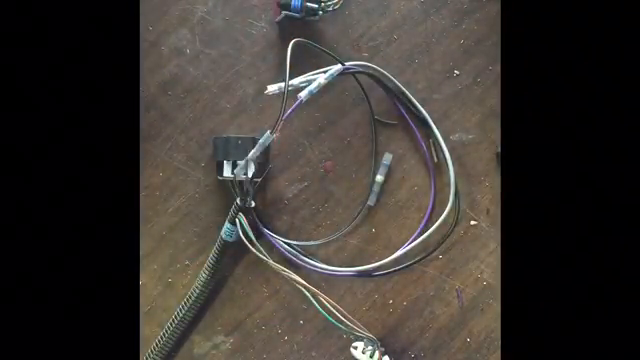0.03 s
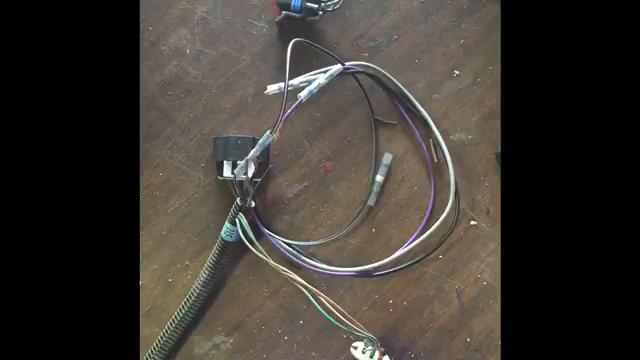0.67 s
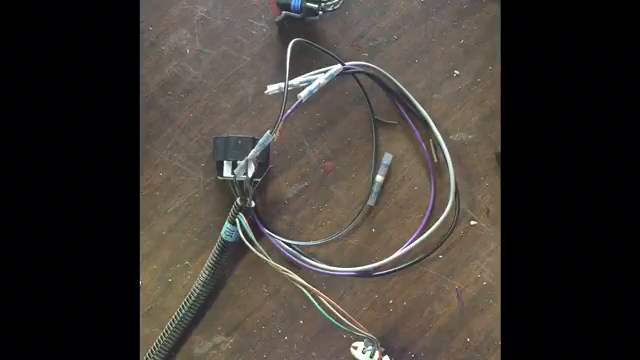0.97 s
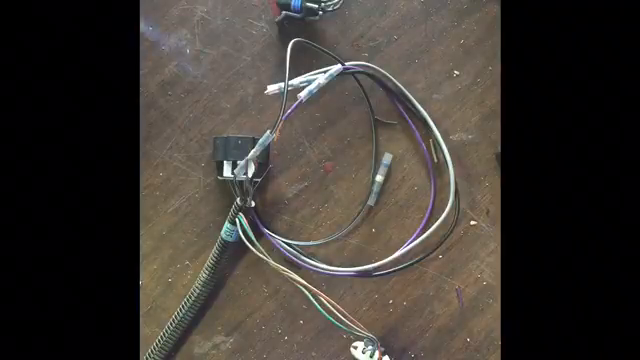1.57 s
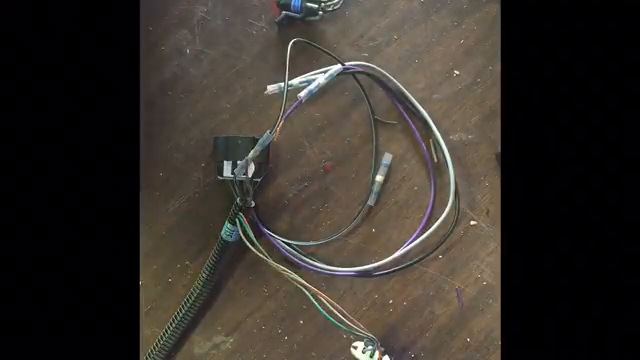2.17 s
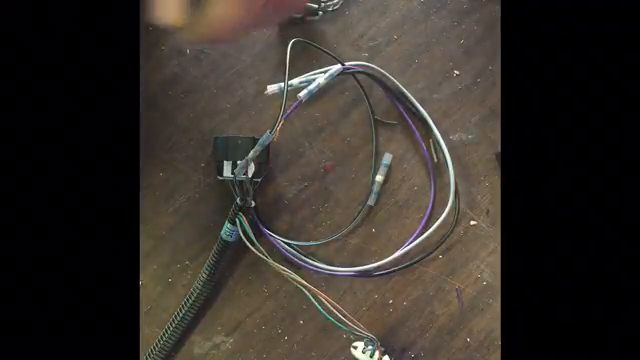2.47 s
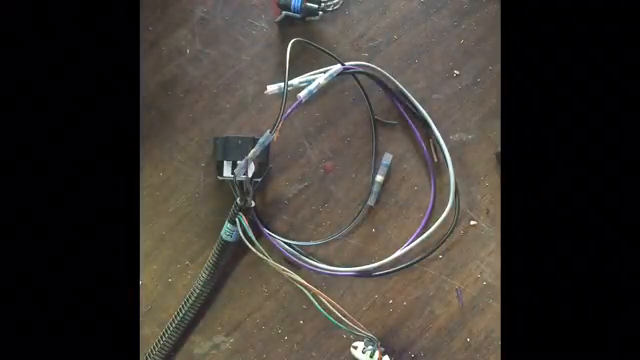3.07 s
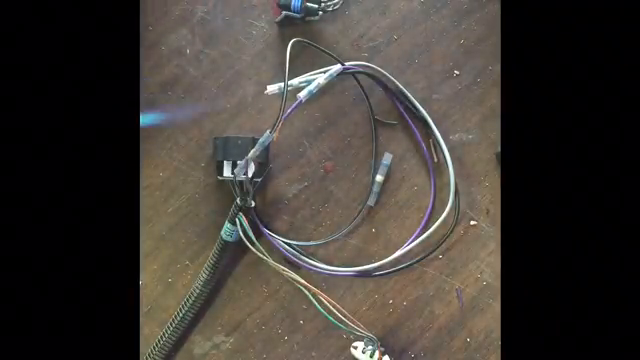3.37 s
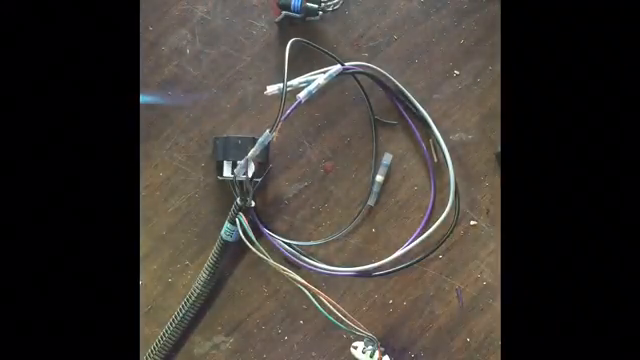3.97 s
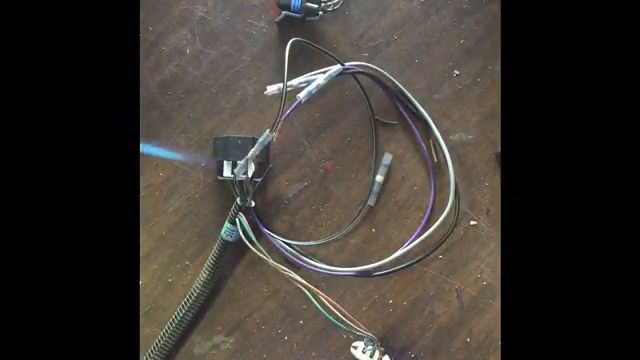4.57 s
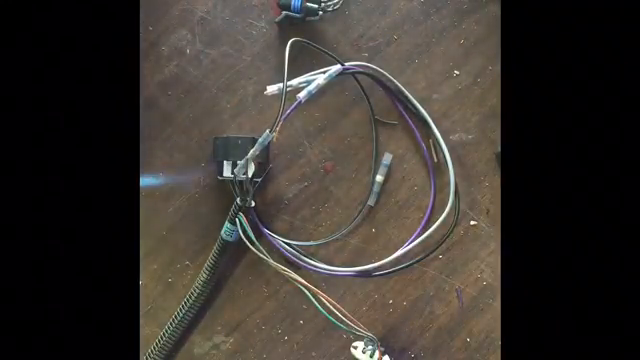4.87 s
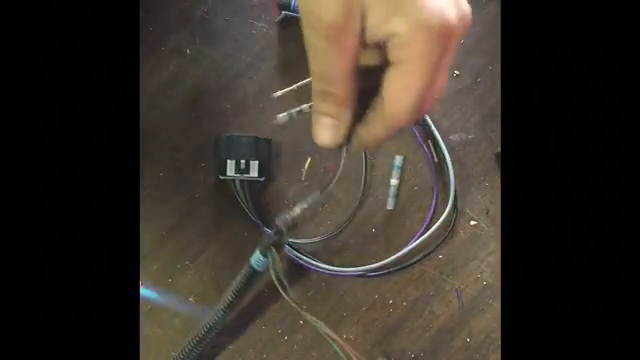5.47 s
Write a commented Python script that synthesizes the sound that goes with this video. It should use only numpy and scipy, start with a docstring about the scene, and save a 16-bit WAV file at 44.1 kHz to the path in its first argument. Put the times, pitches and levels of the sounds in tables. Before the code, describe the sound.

A handheld butane torch is worked close to the microphone in a small, quiet room. Its lock and trigger make sharp plastic clicks, then a spark snaps and the flame catches with a small pop, rushing briefly before it is let go out. Fingers tick and rub on the housing. More loud clicks follow, and the torch lights again, burning on with a steady hiss and soft low roar.

```python
"""A handheld butane torch, lit twice over a wooden table in a small room, close to the microphone.
Each time the lock clacks, the trigger clicks, gas hisses, the piezo striker snaps and the flame catches
with a pop. The first flame is soon let go out; the second burns on with a steady rush, coloured by the
table's echo as the hand moves. Fingers rub and tick on the housing over a faint room rumble."""
import sys
import numpy as np
from scipy import signal
from scipy.fft import rfft, irfft, next_fast_len
from scipy.io import wavfile
from scipy.ndimage import map_coordinates

SR = 44100
rng = np.random.default_rng(int(sys.argv[2]) if len(sys.argv) > 2 else 0)


def unload_audio(sound):
    """Save the sound as a 16-bit wav file, at the path given as the first command line argument."""
    columns = np.transpose(np.atleast_2d(sound))
    # keep every value between -1 and 1, then stretch to whole-number steps
    steps = np.round(np.clip(columns, -1, 1) * 32767)
    wavfile.write(sys.argv[1], SR, steps.astype(np.int16))


N = 251678
TIME = np.arange(N) / SR
AGE = TIME[:4096]  # seconds into one click
CATCH_DELAY_S = .0045  # from spark to flame

# the safety lock clacks over: (t/s, housing pitch/Hz, level/dB, hardness/dB)
LOCKS = [(0.8136, 1750, 9, 4), (2.914, 1818, 13, -3.5)]
# the trigger clicks in: (t/s, housing pitch/Hz, level/dB, hardness/dB)
TRIGGERS = [(0.2232, 1710, -1, 4.5), (1.2965, 1727, 5, 2), (3.2605, 1800, 10.5, -6.5)]
# the torch is lit: (spark t/s, valve shut t/s, snap level/dB, hardness/dB, gas level/dB, flame level/dB)
LIGHTINGS = [(1.4204, 2.016, -6, 4.5, -49.5, -42), (3.372, 5.8, .5, -5, -51, -43.5)]


def undb(db):
    """Decibels to gain."""
    return 10 ** (np.asarray(db) / 20)


def unit_rms(x):
    """Scale to an rms of one."""
    return x / np.sqrt(np.mean(x ** 2))


def unit_energy(x):
    """Scale to an energy of one."""
    return x / np.sqrt(np.sum(x ** 2))


def fade(t, t60):
    """Exponential decay, 60 dB down after t60 seconds."""
    return np.exp(-np.log(1000) * t / t60)


def add(out, s, x):
    """Mix x in at time s."""
    i = int(s * SR)
    out[i:i + len(x)] += x[:N - i]


def colour(x, curve):
    """Causal filter along an (f/Hz, level/dB) curve, built from the cepstrum of its log gain."""
    size = 2 * next_fast_len(len(x))
    hz, db = np.transpose(curve)
    bin_hz = np.maximum(np.arange(size // 2 + 1), 1) * SR / size
    gain = undb(np.interp(np.log(bin_hz), np.log(hz), db))
    cepstrum = irfft(np.log(gain))
    cepstrum[1:size // 2] *= 2
    cepstrum[size // 2 + 1:] = 0
    return irfft(rfft(x, size) * np.exp(rfft(cepstrum)))[:len(x)]


def noise(curve):
    """Coloured noise of rms one."""
    return unit_rms(colour(rng.standard_normal(N), curve))


def wander(rate_hz):
    """Smooth random drift with a spread near one."""
    knots = rng.standard_normal(4096)
    return map_coordinates(knots, [TIME * rate_hz], order=3, mode="wrap")


def burst(rise_s, t60):
    """A short noise burst of energy one, like the dense micro-impacts of parts that meet and settle."""
    onset = 1 - np.exp(-(AGE / rise_s) ** 2)
    return unit_energy(rng.standard_normal(len(AGE)) * onset * fade(AGE, t60))


def room_tone():
    """A faint room rumble under even microphone hiss."""
    # colour of rumble and hiss: (f/Hz, level/dB)
    floor_colour = [(15, -47.5), (25, -23), (75, -1.5), (154, -15), (176, -16.5), (207, -15.5),
                    (462, -21.5), (501, -20.5), (588, -22.5), (769, -23), (2020, -24), (2300, -24.5),
                    (4870, -26), (6540, -25), (15000, -24)]
    return noise(floor_colour) * undb(-62.4 + .3 * wander(3.2))


def finger_rubs(lead_s=0.015, slide_s=0.0092, slide_db=-55):
    """Skin catches and slips on the plastic in grainy swells; lock and trigger slide before they click."""
    # fingers slide on the housing: (t/s, half-width/s, level/dB)
    rubs = [(0.198, 0.017, -48.5), (0.482, .05, -64), (1.336, .004, -52), (2.532, 0.044, -62.5),
            (2.795, 0.11, -68), (3.088, 0.033, -58), (3.185, .008, -58)]
    slides = [(s - lead_s, slide_s, slide_db) for s, *_ in LOCKS + TRIGGERS]
    swell = sum(undb(db) * np.exp(-((TIME - s) / width) ** 2) for s, width, db in rubs + slides)
    grain = unit_rms(undb(2.5 * wander(500)))
    friction = noise([(700, -26), (1700, 2.5), (2700, -9.5), (4000, -6), (8000, -13), (15000, -16.5)])
    return swell * grain * friction


def contacts(strike_hz=1480, tick_hz=1770, crack_per_hardness=0.6):
    """Every click as (t/s, pitch/Hz, thud/dB, housing/dB, tube/dB, crack/dB); hard ones are brighter."""
    # the trigger springs back or latches: (t/s, housing pitch/Hz, level/dB, hardness/dB)
    releases = [(2.0008, 1890, -4.5, 2), (4.7251, 1934, -4.5, -0.5)]
    # loose parts tick under the fingers: (t/s, level/dB, hardness/dB)
    loose_parts = [(0.2, -19, 4.5), (0.2055, -9, 4), (0.6136, -25.5, -12), (0.964, -31.5, 6.5),
                   (.991, -26, 7.5), (1.276, -32, 10.5), (1.957, -15, -2.5), (2.2117, -20.5, -4),
                   (2.217, -22, -1.5), (2.228, -32, -3), (2.431, -31, -20), (2.4985, -30.5, 6),
                   (2.526, -23, -7.5), (2.7263, -33, -9), (2.8907, -31, -8), (3.0523, -15.5, -6),
                   (3.075, -18.5, -0.5), (3.226, -19.5, 0.5), (3.2395, -18, -6.5), (3.6748, -20.5, 1),
                   (4.698, -16, 1)]
    ticks = [(s, tick_hz, db, hardness) for s, db, hardness in loose_parts]
    strikes = [(s, strike_hz, db, hardness) for s, _, db, hardness, _, _ in LIGHTINGS]
    # each part's balance against the ring of the housing: (events, thud/dB, tube/dB, crack/dB)
    parts = [(LOCKS, -17.5, -6.5, -5), (TRIGGERS, -32, -3.5, 2.5), (strikes, -9, 10.5, 14.5),
             (releases, -14.5, -4.5, 11), (ticks, -24.5, -2.5, -4.5)]
    return [(s, hz, db + thud, db, db + tube + hardness, db + crack + crack_per_hardness * hardness)
            for events, thud, tube, crack in parts for s, hz, db, hardness in events]


def ring(modes, tuning, detune, chatter, band_hz):
    """A small body rings from a blow and its chatter, detuned by each grip, and radiates only a band."""
    scale = tuning * (1 + detune * rng.standard_normal(len(modes)))
    tone = sum(undb(db) * fade(AGE, t60) * np.sin(2 * np.pi * (f * scale[k] * AGE + k / 3))
               for k, (f, db, t60) in enumerate(modes))
    blow = (AGE == 0) + chatter * burst(rise_s=0.00064, t60=0.0032)
    struck = signal.fftconvolve(tone, blow)[:len(AGE)]
    return unit_energy(signal.sosfilt(signal.butter(4, band_hz, "band", fs=SR, output="sos"), struck))


def clicks(rattle_db=-9, striker_db=-1):
    """Close up, each click thuds in the grip, rings housing, tube and striker, and cracks with a rattle."""
    # colour of the thud in the grip: (f/Hz, level/dB)
    thud_colour = [(60, -24.5), (200, -14), (400, -10), (650, -17), (900, -2.5), (1200, -3), (2200, -33.5)]
    # modes of the plastic housing: (multiple of its pitch, level/dB, t60/s)
    housing_modes = [(.83, 0, 0.0069), (.92, 1, 0.009), (1.02, 2, 0.012), (1.13, -1.5, 0.007),
                     (1.34, -14, 0.013)]
    # modes of the steel burner tube: (f/Hz before tuning, level/dB, t60/s)
    tube_modes = [(3760, -2, 0.0097), (4630, -5.5, 0.0097), (5753, 3, 0.009), (6095, 1.5, 0.01),
                  (6830, -2.5, 0.011), (7800, -10.5, 0.0087)]
    # modes of the striker and its spring: (f/Hz before tuning, level/dB, t60/s)
    striker_modes = [(9560, -3, 0.01), (9980, -1, .009), (11270, -0.5, .01), (12300, -8, .008),
                     (12660, -3, 0.011), (14830, -3.5, 0.012)]
    # colour of the contact crack: (f/Hz, level/dB)
    crack_colour = [(900, -50.5), (1700, -13), (2400, -5.5), (3000, -1), (5000, -12), (7200, -3.5),
                    (8500, -0.5), (9600, -4), (10400, -7), (11300, -3), (12700, -1), (13500, -7.5),
                    (15000, -6)]
    out = np.zeros(N)
    for s, hz, thud_db, housing_db, tube_db, crack_db in contacts():
        thud = unit_energy(colour(burst(rise_s=0.00037, t60=0.031), thud_colour))
        housing = ring(housing_modes, tuning=hz, detune=0.04, chatter=0.44, band_hz=(0.81 * hz, 3000))
        tube = ring(tube_modes, tuning=0.9416, detune=0.017, chatter=0.94, band_hz=(3000, 9100))
        snap = burst(rise_s=.0005, t60=.006)
        rattle = undb(rattle_db) * burst(rise_s=0.0042, t60=0.016)
        contact = unit_energy(colour(snap + rattle, crack_colour))
        striker = ring(striker_modes, tuning=0.97, detune=0.0091, chatter=0.59, band_hz=(8000, 16000))
        crack = unit_energy(contact + undb(striker_db) * striker)
        body = thud * undb(thud_db) + housing * undb(housing_db) + tube * undb(tube_db)
        add(out, s, body + crack * undb(crack_db))
    return out


def click_spill(delay_s=.0006):
    """The room hears each click from all sides at once, so its modes blur into a smooth colour."""
    # bands in which grip, housing, tube and crack radiate: (centre f/Hz, width/Hz, level/dB)
    bands = [(700, 760, .5), (1750, 1300, -2.5), (5000, 4500, -1), (11500, 13000, -2)]
    hz, width_hz, spill_db = np.transpose(bands)
    impulse = 1. * (AGE == 0)
    out = np.zeros(N)
    for s, _, *band_db in contacts():
        density_db = np.array(band_db) + spill_db - 10 * np.log10(width_hz / (SR / 2))
        grip_db, _, tube_db, _ = density_db
        skirts = [(120, grip_db - 13), (1050, grip_db + 3.5), (2900, tube_db - 0.5)]
        add(out, s + delay_s, colour(impulse, sorted([*zip(hz, density_db), *skirts])))
    return out


def unlit_gas(lead_s=0.11, open_s=0.021):
    """Cold gas hisses through the burner tube from just before the spark until it catches."""
    # colour of the cold hiss: (f/Hz, level/dB)
    hiss_colour = [(800, -24), (1900, -3.5), (2800, -5.5), (4400, -4.5), (5200, 6), (6300, 3), (7400, -5),
                   (8700, 3.5), (10300, -2), (12000, 1), (15000, 1.5)]
    flow = np.zeros(N)
    for spark, *_, gas_db, _ in LIGHTINGS:
        valve = np.clip((TIME - spark + lead_s) / open_s, 0, 1)
        flow += undb(gas_db) * valve * (TIME < spark + CATCH_DELAY_S)
    return flow * noise(hiss_colour)


def jet_hiss(split_hz=10000, waver_db=2.8):
    """The jet rings the hot tube; its beamed top dulls as the nozzle turns, the whistle below wavers."""
    # colour of the jet in the tube: (f/Hz, level/dB)
    jet_colour = [(4000, -20.5), (5050, -7.5), (5500, 1), (5800, 7.5), (6200, -1), (6650, 1), (7500, -13),
                  (8200, -7.5), (9150, 1.5), (9700, -2), (10400, -13), (11800, -5.5), (13800, -3),
                  (15200, -1)]
    # treble at the microphone as the nozzle's aim shifts: (t/s, level/dB)
    aim = [(1.5, -3.5), (1.95, -4.5), (3.7, 0.5), (4.7, 2), (5.1, 0.5), (5.7, -0.5)]
    hiss = noise(jet_colour)
    whistle = signal.sosfiltfilt(signal.butter(3, split_hz, fs=SR, output="sos"), hiss)
    treble_db = np.interp(TIME, *np.transpose(aim))
    return whistle * undb(waver_db * wander(5)) + (hiss - whistle) * undb(treble_db)


def table_echo(x, share, reflection=0.57, further_m=.17, second_gain=-0.31):
    """The table returns the flame's sound, a weaker echo behind; the hollow colour sweeps with the hand."""
    # the hand moves the flame over the table: (t/s, extra path of the echo/m)
    detour = [(1.56, 0.5), (1.78, 0.3), (2.0, 0.3), (3.8, 0.42), (4.0, 0.353), (4.38, 0.419), (4.8, 0.3),
              (5.0, .36), (5.12, 0.43), (5.3, 0.428), (5.44, 0.38), (5.7, 0.36)]
    path_m = np.interp(TIME, *np.transpose(detour))
    first, second = (map_coordinates(x, [(TIME - metres / 343) * SR], order=3)  # sound at 343 m/s
                     for metres in (path_m, path_m + further_m))
    gain = share * reflection
    return (x + gain * (first + second_gain * second)) / np.sqrt(1 + gain ** 2)


def flame(catch_s=.018, drain_s=0.14, calm_db=-57.5, rush_db=-14, jet_db=-9):
    """Combustion roars low, eddies rush above it; the jet's hiss dies first as the pressure drains."""
    # turbulence of the flame, heard relative to calm_db: three stretches of (t/s, level/dB)
    turbulence = [
        [(1.5, -55.5), (1.514, -56), (1.766, -52), (1.77, -60), (1.94, -61)],
        [(3.48, -59), (3.706, -55), (4.198, -59), (4.364, -56), (4.66, -58)],
        [(4.82, -59), (4.936, -61), (5.228, -51.5), (5.496, -60), (5.7, -56.5)],
    ]
    # colour of the combustion roar: (f/Hz, level/dB)
    roar_colour = [(50, -29.5), (100, -8.5), (140, -10), (190, 3.5), (240, 1), (310, -0.5), (390, -0.5),
                   (470, -11), (610, 0.5), (760, -4), (930, 0), (1200, -5), (1600, -4.5), (2000, -11),
                   (2700, -26.5), (4000, -49.5)]
    # colour of the eddies: (f/Hz, level/dB)
    rush_colour = [(900, -20), (1400, 0.5), (2000, -6), (2600, 2), (3200, -3), (3900, -4.5), (4400, -6.5),
                   (4900, -12), (6500, -30)]
    pressure, size = np.zeros(N), np.zeros(N)
    for spark, shut, *_, flame_db in LIGHTINGS:
        catch = np.clip((TIME - spark - CATCH_DELAY_S) / catch_s, 0, 1)
        burn = catch * np.clip(1 - (TIME - shut) / drain_s, 0, 1)
        pressure += burn
        size += undb(flame_db) * burn ** 2.4
    stir_db = np.interp(TIME, *np.vstack(turbulence).T) - calm_db
    flutter_db = wander(28)
    roar = noise(roar_colour) * undb(.2 * stir_db + flutter_db)
    rush = noise(rush_colour) * undb(rush_db + stir_db + flutter_db + 1.6 * wander(400))
    jet = pressure * jet_hiss() * undb(jet_db + .3 * stir_db + .4 * wander(14))
    return size * (table_echo(roar, share=.55) + table_echo(rush, share=.82) + table_echo(jet, share=.65))


def flash(s, width_s):
    """A pocket of gas expands at once: a push, then a pull."""
    u = (s - TIME) / width_s
    return u * np.exp((1 - u ** 2) / 2)


def ignition_pops(delay_s=.0093, spread_s=.011, pop_db=-20.5, cloud_db=-10, puff_db=-9):
    """The gas in the burner flashes, then the slower cloud in front of it, leaving a short low puff."""
    puff_colour = [(25, -19), (50, -2.5), (85, 3), (130, -4.5), (250, -3.5), (450, -20), (1200, -43)]
    out = np.zeros(N)
    for spark, *_ in LIGHTINGS:
        s = spark + delay_s
        burner = flash(s, width_s=.0009)
        cloud = undb(cloud_db) * flash(s + spread_s, width_s=.0024)
        out += undb(pop_db) * (burner + cloud)
        puff = unit_energy(colour(burst(rise_s=0.0038, t60=0.09), puff_colour))
        add(out, s, undb(puff_db) * puff)
    return out


def room(x, scatter_db=-11, tail_db=-23):
    """Quick scatter from the table and nearby things, then the short tail of the small room."""
    # colour of the reflections: (f/Hz, level/dB)
    room_colour = [(100, -8.5), (600, -2.5), (1500, 2), (2600, 3), (6000, 1.5), (10000, 2.5), (15000, -0.5)]
    t = TIME[:SR // 2]
    scatter = undb(scatter_db) * burst(rise_s=0.0019, t60=.042)
    tail_shape = fade(t, t60=0.19) * (1 - np.exp(-t / 0.011))
    response = undb(tail_db) * unit_energy(rng.standard_normal(len(t)) * tail_shape)
    add(response, 0, scatter)
    return signal.fftconvolve(x, colour(response, room_colour))[:N]


def scene():
    """The torch close to one microphone, with the room behind it."""
    gas_and_hand = ignition_pops() + finger_rubs() + unlit_gas() + flame()
    return (clicks() + gas_and_hand + room(click_spill() + gas_and_hand) + room_tone())[None]


def record(dry, low_hz=42, top_hz=15200):
    """The microphone drops the deep bass; the recorder clips the loudest clicks and cuts the top."""
    thinned = signal.sosfilt(signal.butter(4, low_hz, "high", fs=SR, output="sos"), dry)
    clipped = thinned / (1 + thinned ** 6) ** (1 / 6)
    return signal.sosfilt(signal.ellip(10, .2, 70, top_hz, fs=SR, output="sos"), clipped)


dry = scene()
out = record(dry)
unload_audio(out)
```